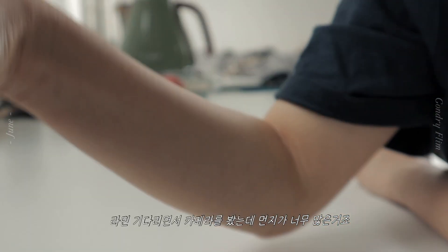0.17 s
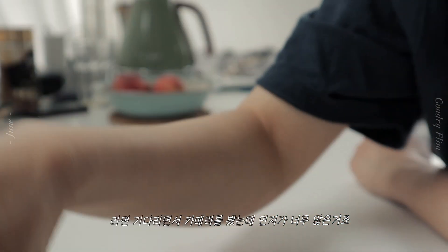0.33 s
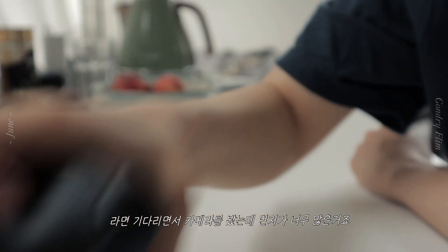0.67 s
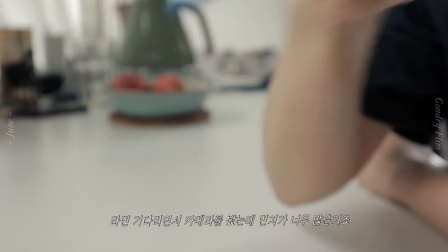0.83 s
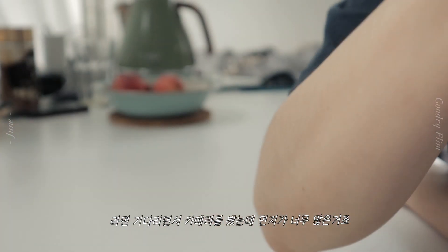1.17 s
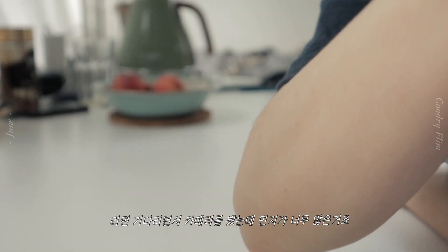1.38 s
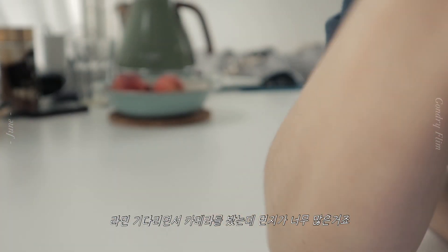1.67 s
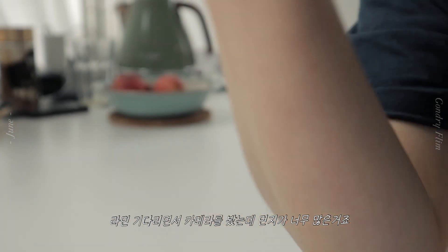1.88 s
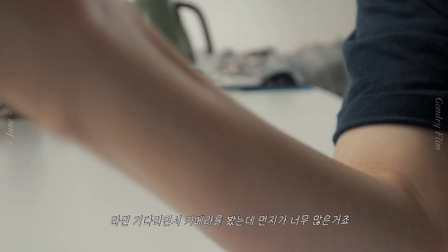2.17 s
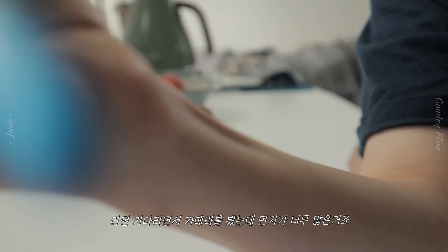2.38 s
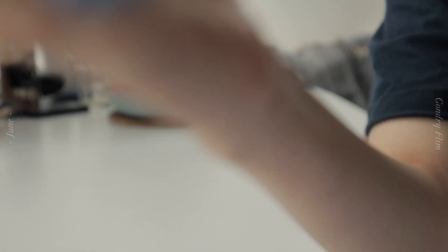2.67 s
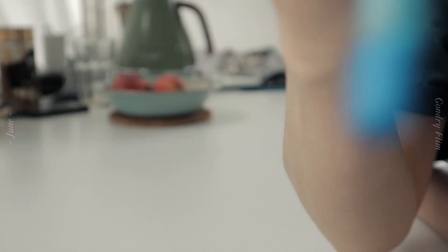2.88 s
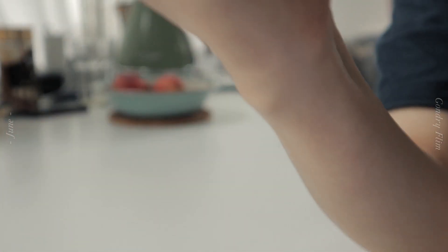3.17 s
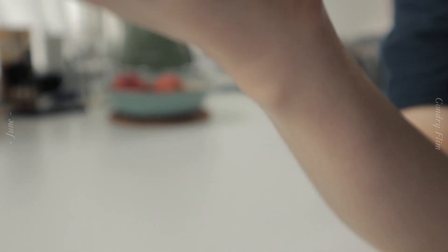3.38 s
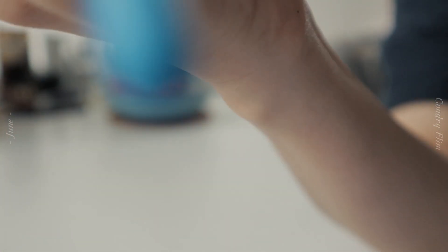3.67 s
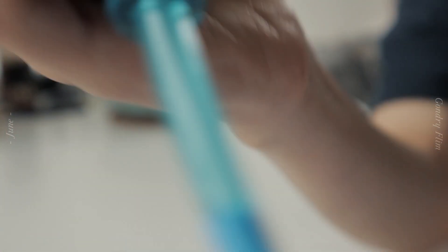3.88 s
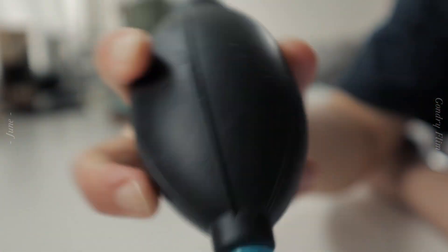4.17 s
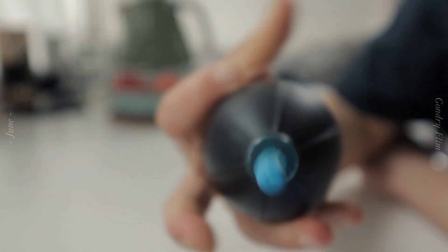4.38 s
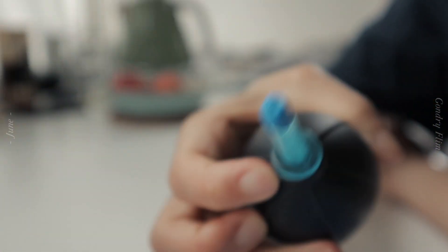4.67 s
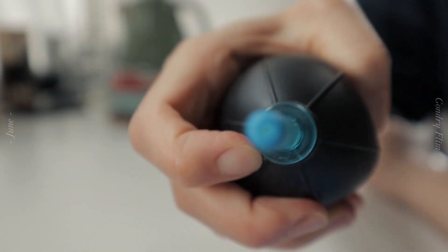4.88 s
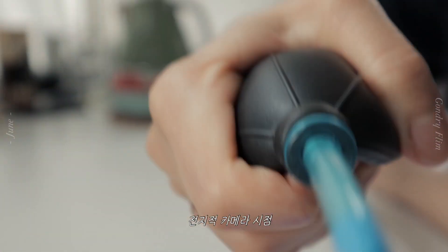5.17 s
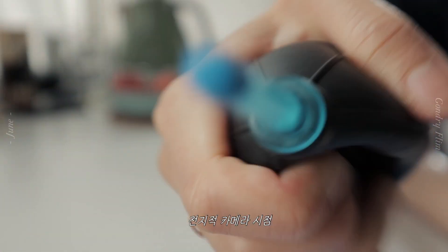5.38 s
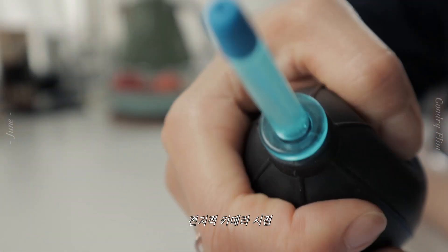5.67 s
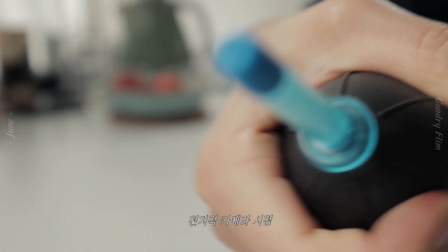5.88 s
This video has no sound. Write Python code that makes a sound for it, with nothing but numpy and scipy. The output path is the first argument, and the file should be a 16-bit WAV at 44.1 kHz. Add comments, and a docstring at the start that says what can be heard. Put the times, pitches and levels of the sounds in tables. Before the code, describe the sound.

Small rubbery taps, then sharp airy puffs from a squeezed bulb blower, two striking the microphone with dull bursts, each refill hissing thinly between.

```python
"""Fingers tap and rub rubber over a quiet, humming room, then an air blower is squeezed again and again at a camera.
Each squeeze is shaped noise hissing through a resonant nozzle; sweeps of the jet rush and splash on the body.
The nearest jets buffet the microphone ports with dull, lumpy bursts of noise.
Between squeezes the bulb refills with hiss and a thin whistle that can jump between two notes."""
import sys
import numpy as np
from scipy import signal
from scipy.fft import rfft, irfft
from scipy.io import wavfile

SR = 44100
rng = np.random.default_rng(int(sys.argv[2]) if len(sys.argv) > 2 else 0)


def int16_out(signal):
    """Quantize to a 16-bit WAV file."""
    q = np.round(np.clip(np.atleast_2d(signal).T, -1, 1) * 32767)
    wavfile.write(sys.argv[1], SR, q.astype(np.int16))


N = 265482

# Colour of still room air. Each row: frequency in Hz, relative density in dB per Hz.
AIR_COLOUR = [(20, -8), (50, -4.5), (89, -3.5), (128, -6), (242, -5), (320, -9.5), (500, -12.5),
              (1000, -14), (2200, -17.5), (4200, -29.5), (8000, -35.5), (10500, -40), (12500, -50),
              (14000, -73)]
# How alike the room air is at both ports. Each row: frequency in Hz, left-right likeness.
AIR_LIKENESS = [(50, 1), (400, 0.88), (2000, 0.75), (5000, 0), (10000, 0)]
# Partials of a kitchen appliance. Each row: frequency in Hz, relative level in dB.
HUM_PARTIALS = [(86.1, -65), (156.1, -69.5), (242.2, -67), (279.9, -72), (748.3, -76), (1001, -71)]
# Decay of the room. Each row: frequency in Hz, time to fall by 60 dB in seconds.
ROOM_DECAY = [(100, .35), (500, .3), (2000, 0.22), (8000, 0.11), (14000, .18)]
# Tone of the room tail. Each row: frequency in Hz, relative level in dB.
ROOM_TONE = [(100, -5.5), (350, -0.5), (700, 3), (1200, 0.5), (3000, 5), (12000, 4)]

# Finger taps and the rubber snapping back.
# Each row: start in seconds, peak in dB, pitch in Hz, decay in seconds, contact time in seconds.
FINGER_TAPS = [(0.2238, -46, 2130, 0.00058, 0.00024), (.236, -44, 1510, 0.00065, 0.00027),
               (.253, -43.5, 1870, 0.0014, 0.00035), (0.286, -42.5, 690, 0.00099, 0.00027),
               (0.3133, -29.5, 3250, 0.00052, 0.000087), (.329, -53, 3520, .0005, .00015),
               (.3425, -35, 4200, 0.00035, 0.000044), (.3555, -28, 2200, 0.00018, 0.00024),
               (.358, -34, 570, 0.0023, 0.00022), (.6365, -49, 1890, .001, 0.00025),
               (.6545, -45.5, 785, 0.00089, 0.00084), (2.352, -45.5, 220, 0.0039, 0.001),
               (2.793, -41, 262, 0.0025, 0.00082), (3.968, -51, 1800, 0.0017, 0.00031),
               (4.008, -37.5, 231, 0.0058, 0.0024), (5.4601, -16, 230, 0.0017, 0.00067)]
# Skin and sleeve rubbing. Each row: crest in seconds, rise in seconds, fall in seconds, relative level in dB.
RUBBING = [(.24, 0.019, 0.064, -61.5), (.318, 0.0082, 0.06, -50.5), (3.97, .012, .012, -50),
           (4.515, .03, .03, -60)]
# Colour of the rubbing. Each row: frequency in Hz, relative density in dB per Hz.
RUB_COLOUR = [(100, -50), (300, 12), (700, 1), (1200, 4), (1900, 6), (3300, -2), (5500, -21), (9000, -21),
              (12000, -21), (14000, -38)]

# The valve snapping shut as a squeeze begins. Each row: start in seconds, peak in dB.
VALVE_SNAPS = [(1.463, -37), (1.918, -47), (2.352, -45), (2.793, -41), (3.228, -41), (3.619, -44)]
# Standing waves in the nozzle. Each row: frequency in Hz, width in Hz, gain in dB.
NOZZLE_MODES = [(5140, 350, 5), (7830, 280, 6.5), (10540, 600, 1.5)]
# Colour of the air intake. Each row: frequency in Hz, relative density in dB per Hz.
INTAKE_COLOUR = [(500, -13.5), (2100, 4.5), (3500, -2), (4400, -6), (6300, -7), (7500, -3.5), (8700, -3),
                 (10000, -1), (11000, 6.5), (11700, -5.5), (12800, -7.5), (14000, -24.5)]

# Air striking the microphone. Each row: crest in seconds, level in dB, rise in seconds, fall in seconds,
# corner in Hz, left-right likeness of the small eddies from -1 to 1.
PORT_GUSTS = [(1.166, -38, 0.036, 0.016, 613, 0.61), (1.192, -30.5, 0.013, 0.014, 830, 1),
              (1.224, -37, 0.017, 0.013, 170, 0.71), (1.532, -34, 0.019, 0.045, 168, -0.3),
              (1.583, -23, 0.012, 0.02, 200, 0.35), (1.603, -17, 0.006, 0.0099, 483, -0.31),
              (1.624, -19.5, 0.0073, 0.01, 324.5, -0.65), (1.654, -47.5, 0.011, 0.014, 160, -0.12),
              (1.942, -11, 0.0031, 0.018, 677, -0.73), (1.962, -23, 0.012, 0.0067, 533, 0.8),
              (2.014, -27, 0.023, 0.019, 330, -0.46), (2.037, -23.5, 0.0065, 0.0082, 250, .5),
              (2.134, -41, 0.025, 0.016, 185, -0.026), (5.128, -42.5, 0.008, 0.039, 300, 0.98),
              (5.921, -47, 0.022, 0.06, 273, 0.9), (6.006, -36.5, 0.044, 0.077, 93, 0.62)]
# Response of the ports to eddies. Each row: frequency in Hz, gain in dB.
PORT_RESPONSE = [(15, -22.5), (40, -7.5), (80, -0.5), (160, 3.5), (290, 3), (450, 1.5), (1700, 0),
                 (2600, -7), (4000, -18)]

# The jet sweeping across the camera. Each row: crest in seconds, rise in seconds, fall in seconds,
# rush level in dB, splash level in dB, pitch factor of the splash, shape (1 pointed, 2 round, 4 flat-topped).
JET_SWEEPS = [ (1.192, 0.029, 0.014, -39, -36.5, 1.11, 1.5), (1.548, .054, .05, -39.5, -43, 1.37, 4),
              (1.947, 0.0058, 0.019, -51, -34, 1.14, 1.16), (2.033, 0.027, 0.057, -32.5, -45, 2.06, 1.67),
              (2.434, .035, .02, -41, -44.5, 0.95, 1.3), (3.334, .066, 0.07, -42.5, -43, 0.84, 3.5),
              (3.727, .044, 0.035, -36, -40, 0.98, 1.33), (5.165, 0.05, 0.057, -54.5, -48, 0.84, 5.9),
              (6.01, 0.047, 0.049, -53.5, -44.5, 0.62, 2), ]
# Colour of the jet beyond the nozzle. Each row: frequency in Hz, relative density in dB per Hz.
JET_COLOUR = [(100, -30), (500, -15.5), (1100, -7), (1500, -8.5), (1850, -1), (2300, 1), (2700, -3),
              (3300, -7.5), (4300, -18.5), (6000, -17.5), (10000, -45.5)]
# Colour of the splash at pitch factor 1. Each row: frequency in Hz, relative density in dB per Hz.
SPLASH_COLOUR = [(40, -16), (200, -11.5), (450, -7), (750, 0.5), (1100, 2), (1500, -5), (2200, -8),
                 (4000, -38.5)]

# The bulb drawing air back in. Each row: start in seconds, length in seconds, whistle level in dB,
# relative hiss level in dB, suction at first, suction at last, moment when the fingers shift in seconds,
# length of the shift in seconds, change of suction. Around suction 1 the whistle jumps to its upper note.
BULB_REFILLS = [ (1.294, .135, -43.5, -66, 2.1, 1.1, 1.368, .019, -.85),
                (1.718, .168, -49.5, -66, 1.85, 1.5, 1.805, .045, -.45),
                (2.18, .142, -56.5, -70, 1.8, 1, 2.25, .022, -.25),
                (2.614, .16, -54.5, -71, 1.25, 1.25, 2.68, .017, -.55),
                (3.077, .118, -49.5, -69, 2.1, .3, 3.158, .014, -.2),
                (3.467, .131, -52.5, -66, 1.6, .5, 3.53, .03, .7),
                (3.878, .136, -52.5, -68, 1.65, 1.6, 3.956, .018, .95),
                (5.36, .114, -56, -66, 1.2, 3, 5.42, .025, .9), ]

# Squeezes, each a steady push with one surge. Each row: start in seconds, length in seconds, push level in dB,
# crest of the surge in seconds, its rise in seconds, its fall in seconds, surge level in dB,
# hardness at the crest from 0 to 1, then for the treble: left lead in radians,
# left over right in dB, left-right likeness from 0 to 1.
BULB_SQUEEZES = [ (0.962, 0.3, -55, 1.185, 0.11, 0.045, -41, 0.34, -1.8, -4, 0.8),
                 (1.456, 0.25, -55, 1.573, 0.05, 0.04, -27.5, 0.96, -1.9, -6.5, 0.5),
                 (1.918, 0.064, -48.5, 1.926, .008, 0.022, -48, .1, 0, -2, .7),
                 (1.947, 0.24, -63, 2.054, 0.043, 0.044, -30.5, 1, 1.7, 1, 0.9),
                 (2.35, 0.25, -58.5, 2.44, 0.063, 0.11, -51, 0.85, 2.1, -2, 0.3),
                 (2.788, 0.27, -58.5, 2.95, 0.13, 0.081, -47.5, 0.48, -0.98, -3, 0.5),
                 (3.22, 0.23, -56.5, 3.338, 0.063, 0.065, -45.5, 0.67, 0, -1, 0.7),
                 (3.619, 0.26, -53.5, 3.728, 0.044, 0.047, -43, 1, 0.81, -1.5, 0.44),
                 (5.071, 0.27, -60, 5.155, .04, 0.13, -54, 0.56, -1.1, -2.5, 0.46),
                 (5.851, 0.28, -59.5, 6.02, 0.076, .05, -48.5, 0.6, -0.42, -1, 0.74), ]
# Nozzle hiss at a gentle squeeze. Each row: frequency in Hz, relative density in dB per Hz.
GENTLE_COLOUR = [(1500, -17.5), (4000, -29.5), (6200, -39), (7300, -23), (8500, -19.5), (9600, -5),
                 (10600, 2), (11500, -8), (12600, 2), (13400, -8.5), (14000, -35.5), (16000, -49.5)]
# Nozzle hiss at a hard squeeze. Each row: frequency in Hz, relative density in dB per Hz.
HARD_COLOUR = [(1500, -12), (3500, -4), (4600, -5.5), (5800, -8), (7000, -2), (7900, -2), (8700, 3),
               (10300, 2.5), (11600, -2.5), (12500, -8.5), (13300, -20.5), (14000, -26.5), (16000, -47.5)]


def amp(db):
    """Decibels to gain."""
    return 10 ** (np.asarray(db) / 20)


def unit(x):
    """Scales to rms 1."""
    return x / np.sqrt(np.mean(x ** 2) + 1e-20)


def read(points, hz):
    """Reads a table on a log-frequency axis."""
    f, value = np.transpose(points)
    return np.interp(np.log(hz + 1), np.log(f + 1), value)


def add(mix, s, sound):
    """Mixes a sound in at a time in seconds."""
    part = mix[..., round(s * SR):][..., :sound.shape[-1]]
    part += sound[..., :part.shape[-1]]


def bins(size):
    """Frequencies of a spectrum in Hz."""
    return np.fft.rfftfreq(size, 1 / SR)


def waver(size, hz):
    """Random drift of rms 1, with little movement faster than the given rate."""
    white = rfft(rng.standard_normal(size))
    return unit(irfft(white / (1 + (bins(size) / hz) ** 4), size))


def pair(size, same):
    """Spectra of white noise at two ports with a given likeness."""
    a, b = rfft(rng.standard_normal((2, size)))
    same = np.clip(same, -1, 1)
    return np.array([a, same * a + np.sqrt(1 - same ** 2) * b])


def coloured(z, points, size, band):
    """Colours two port spectra into sound; the mean of the ports gets rms 1 within a band."""
    hz = bins(size)
    z = z * amp(read(points, hz))
    in_band = (hz > band[0]) * (hz < band[1])
    return irfft(z, size) / irfft(z.mean(0) * in_band, size).std()


def swell(t, rise, fall, shape=1.9):
    """A bell of height 1 at t = 0 with its own rise and fall; a higher shape flattens its top."""
    return np.exp(-abs(t / np.where(t < 0, rise, fall)) ** shape)


def around(rise, fall):
    """Times that span a swell."""
    return np.arange(-np.pi * rise, np.pi * fall, 1 / SR)


def held(t, length, attack, release):
    """Attack, hold and release with rounded shoulders."""
    ramps = np.minimum(t / attack, (length - t) / release)
    return np.sin(np.pi / 2 * np.clip(ramps, 0, 1))


def background(air_db=-57.48, hum_trim_db=-2.0):
    """Still room air as coloured noise, and a faint hum whose partials wander in phase."""
    z = pair(N, read(AIR_LIKENESS, bins(N)))
    air = unit(irfft(z * amp(read(AIR_COLOUR, bins(N))), N))
    t = np.arange(N) / SR
    hum = 0
    for hz, db in HUM_PARTIALS:
        phase = 2 * np.pi * hz * t + 0.6 * waver(N, 1.9)
        hum = hum + amp(db + hum_trim_db) * np.sqrt(2) * np.sin(phase)
    return amp(air_db) * air + hum


def room(x, mingle=0.36):
    """A short diffuse tail that decays at its own rate in each frequency region."""
    hz, t, z = signal.stft(rng.standard_normal((2, SR // 2)), SR, nperseg=256)
    level_db = read(ROOM_TONE, hz)[:, None] - 60 * t / read(ROOM_DECAY, hz)[:, None]
    after_gap = t > .004  # seconds
    tail = signal.istft(z * amp(level_db) * after_gap, SR, nperseg=256)[1]
    tail = tail + mingle * tail[::-1]  # the ports are close together
    return signal.fftconvolve(x, tail / np.linalg.norm(tail[0]), axes=1)[:, :N]


def handling(rub_trim_db=-2, grain_db=5.5):
    """Taps briefly ring the damped rubber; rubbing is grainy noise."""
    out, t = np.zeros((2, N)), np.arange(SR // 16) / SR
    for s, db, hz, decay, contact in FINGER_TAPS:
        push = np.sin(np.pi * np.minimum(t / contact, 1)) ** 2
        ring = np.exp(-t / decay) * np.cos(2 * np.pi * hz * t)
        tap = signal.fftconvolve(push, ring)
        add(out, s, amp(db) * tap / abs(tap).max())
    for s, rise, fall, level in RUBBING:
        t = around(rise, fall)
        size = len(t)
        rub = coloured(pair(size, 0.83), RUB_COLOUR, size, (1200, 6000))
        grain = unit(amp(grain_db * waver(size, 140)))
        add(out, s + t[0], swell(t, rise, fall) * amp(level + rub_trim_db) * rub * grain)
    return out


def tube(hz):
    """Gain of the nozzle's standing waves, each a resonant peak."""
    return amp(sum(db / (1 + (2 * (hz - f) / width) ** 2) for f, width, db in NOZZLE_MODES))


def valve(decay_s=0.00074):
    """Each closing flap sends a tiny crack of decaying noise through the nozzle."""
    out, size = np.zeros((2, N)), SR // 16
    hz = bins(size)
    fade = np.exp(-np.arange(size) / SR / decay_s)
    for s, db in VALVE_SNAPS:
        z = pair(size, 0.52) * tube(hz) * amp(read(INTAKE_COLOUR, hz))
        crack = irfft(z, size) * fade
        add(out, s, amp(db) * crack / abs(crack).max())
    return out


def gusts(slope=2.1, shared_hz=125):
    """Eddies press on each port: dull, lumpy bursts, each rolling off above its own corner."""
    out, size = np.zeros((2, N)), SR // 2
    t, hz = np.arange(size) / SR - 1 / 4, bins(size)
    small = 1 - 1 / (1 + (hz / shared_hz) ** 4)  # large eddies cover both ports alike
    for s, db, rise, fall, corner, same in PORT_GUSTS:
        z = pair(size, 1 - (1 - same) * small)
        rolloff = np.sqrt(1 + (hz / corner) ** (2 * slope))
        eddies = irfft(z * amp(read(PORT_RESPONSE, hz)) / rolloff, size)
        burst = np.exp(-(np.minimum(t, 0) / rise) ** 2 - np.maximum(t, 0) / fall)
        burst_rms = np.sqrt(np.mean(burst ** 2))
        add(out, s + t[0], amp(db) * unit(eddies * burst) * burst_rms)
    return out


def rush(size, same=1.0):
    """The turbulent jet beyond the nozzle: coloured noise at rms 1 in its main band."""
    return coloured(pair(size, same), JET_COLOUR, size, (1700, 3200))


def sweep(row, flutter_db=1.13):
    """As the jet swings toward the camera its rush swells and it splashes off the body."""
    s, rise, fall, rush_level, splash_level, pitch, shape = row
    t = around(rise, fall)
    size = len(t)
    colour = [(f * pitch, db) for f, db in SPLASH_COLOUR]
    splash = coloured(pair(size, 0.95), colour, size, (600, 1400))
    air = amp(rush_level) * rush(size) + amp(splash_level) * splash
    flutter = amp(flutter_db * waver(size, 119.26))
    return s + t[0], swell(t, rise, fall, shape) * air * flutter


def refill(row, jitter_hz=95, hiss_trim_db=-1, low_note_db=-4, flutter_db=2.5):
    """Air drawn through the valve whistles; the note rises with suction and jumps to the next mode."""
    start, length, whistle_level, hiss_level, first, last, shift_s, shift_length, shift = row
    t = np.arange(0, length, 1 / SR)
    size = len(t)
    finger_shift = shift * swell(start + t - shift_s, shift_length, shift_length)
    pull = first + (last - first) * t / length + finger_shift
    suction = pull * held(t, length, .04, .03)

    upper = np.clip(.5 + (suction - 1) / .16, 0, 1)  # share of the upper note
    # too little or too much pull gives only hiss: full voice from .85, silent by 2.4
    speaks = np.clip(suction / .85, 0, 1) * np.clip((2.4 - suction) / .6, 0, 1)
    low_hz = 10250 + 950 * suction
    high_hz = 12050 + 1000 * (suction - 1)
    notes = [(low_hz, amp(low_note_db) * np.sqrt(1 - upper)), (high_hz, np.sqrt(upper))]
    tone = 0
    for hz, share in notes:
        cycles = np.cumsum(hz + jitter_hz * waver(size, 450)) / SR
        tone = tone + share * np.exp(2j * np.pi * cycles)
    tone *= np.sqrt(2) * speaks * amp(whistle_level + flutter_db * waver(size, 150))
    port_angle = 0.7  # radians; so short a wave meets the two ports out of step
    port_turn = np.exp(1j * port_angle * np.array([[-1], [1]]))
    whistle = (tone * port_turn).real / np.cos(port_angle)

    z = pair(size, 0.39) * tube(bins(size))
    hiss = coloured(z, INTAKE_COLOUR, size, (7000, 10000))
    hiss = amp(hiss_level + hiss_trim_db) * suction ** 0.25 * hiss  # grows gently with suction
    return start, held(t, length, 0.0095, 0.0095) * (whistle + hiss)


def nozzle(row, jet_db=-9, flutter_db=1.0, shade_hz=4500, push_hardness=.5):
    """The nozzle hiss grows and hardens as the squeeze surges; the jet rushes below it."""
    start, length, push_db, crest, rise, fall, surge_db, hardness, lead, side_db, same = row
    t = np.arange(0, length, 1 / SR)
    size, hz = len(t), bins(len(t))
    surge = swell(start + t - crest, rise, fall)
    flow = held(t, length, .02, 0.09) * (amp(push_db) + amp(surge_db) * surge)

    treble = 1 - 1 / (1 + (hz / shade_hz) ** 4)  # only shorter waves are shaded by the camera body
    z = pair(size, 1 - (1 - same) * treble) * tube(hz)
    z[0] *= amp(side_db * treble) * np.exp(1j * lead * treble)
    gentle = coloured(z, GENTLE_COLOUR, size, (7000, 14000))
    hard = coloured(z, HARD_COLOUR, size, (7000, 14000))
    # push_hardness is the share of the hardness that is there without the surge
    force = np.clip(hardness * (push_hardness + (1 - push_hardness) * surge), 0, 1)
    hiss = (1 - force) * gentle + force * hard
    puff = hiss + amp(jet_db) * rush(size)
    return start, flow * puff * amp(flutter_db * waver(size, 121))


def scene(air_room_db=-17, tap_room_db=-13):
    """Blower and hands excite the room; the gusts exist only at the microphone."""
    air = valve()
    for source, rows in ((nozzle, BULB_SQUEEZES), (sweep, JET_SWEEPS), (refill, BULB_REFILLS)):
        for row in rows:
            add(air, *source(row))
    hands = handling()
    tail = room(amp(air_room_db) * air + amp(tap_room_db) * hands)
    return air + hands + tail + gusts() + background()


def record(dry, ceiling=.48, edge_hz=15500):
    """The microphone rounds off the strongest peaks; then a low-pass limits the band."""
    rounded = dry / (1 + (dry / ceiling) ** 4) ** (1 / 4)
    lowpass = signal.firwin(511, edge_hz, window=("kaiser", 9), fs=SR)
    return signal.oaconvolve(rounded, lowpass[None], "same")


dry = scene()
out = record(dry)
int16_out(out)
```